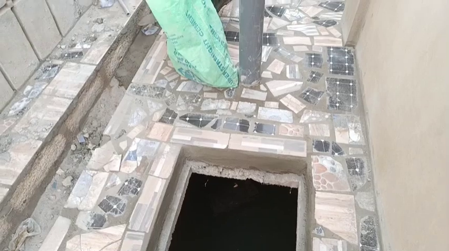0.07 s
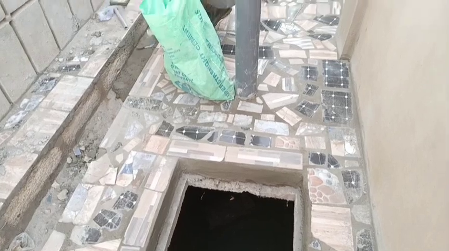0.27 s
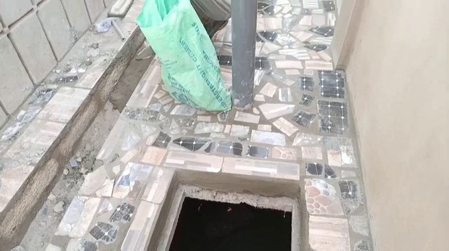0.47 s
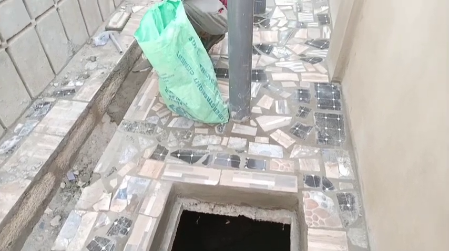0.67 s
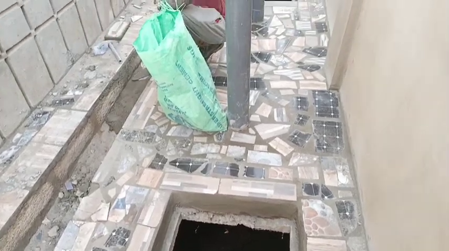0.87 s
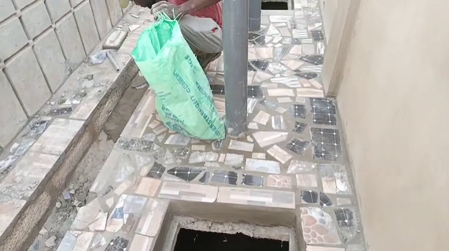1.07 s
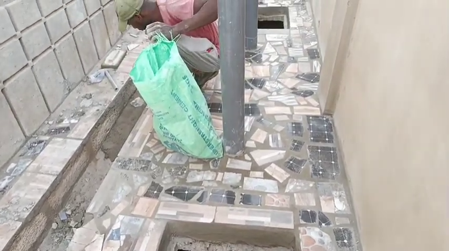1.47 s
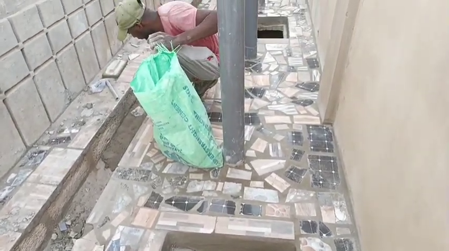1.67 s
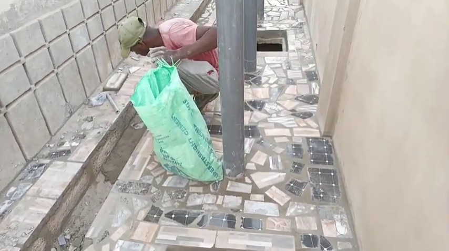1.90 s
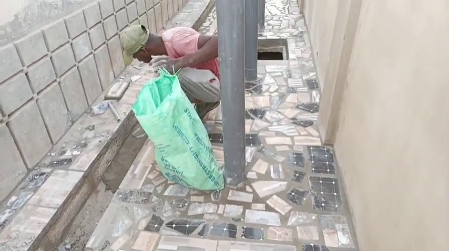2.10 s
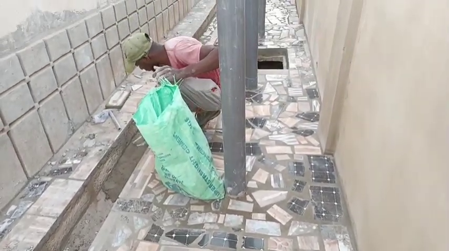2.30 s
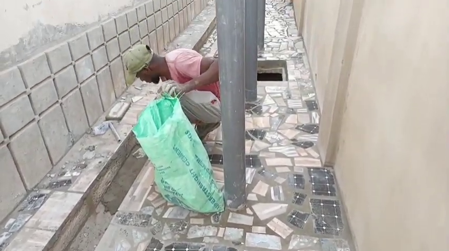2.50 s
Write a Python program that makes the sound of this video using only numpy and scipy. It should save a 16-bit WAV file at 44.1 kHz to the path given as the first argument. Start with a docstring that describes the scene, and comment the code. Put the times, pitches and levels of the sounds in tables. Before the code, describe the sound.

Sharp knocks on broken floor tiles, with clinking pieces and a gritty spill between echoing walls.

```python
"""Knocking broken floor tiles loose

In a narrow outdoor passage, heavy knocks thud and crack, loose pieces clink, and one handful
clatters down in a spill of grit. The walls echo and boom near 100 Hz. A limiter turns the sound
down just ahead of each heavy knock and lets it swell back through the echo."""
import sys
import numpy as np
from scipy import signal
from scipy.fft import rfft, irfft, next_fast_len
from scipy.io import wavfile
from scipy.ndimage import uniform_filter1d, minimum_filter1d

SR = 44100
rng = np.random.default_rng(int(sys.argv[2]) if len(sys.argv) > 2 else 0)


def put_to_file(sound):
    """Save the sound as 16-bit audio at rate SR, in the file named by the first command-line argument."""
    columns = np.atleast_2d(sound).T  # one column per channel
    safe = np.clip(columns, -1, 1)
    whole_steps = np.round(safe * 32767)
    wavfile.write(sys.argv[1], SR, whole_steps.astype(np.int16))


N = 116865
T = np.arange(SR) / SR  # one second of time, for single sounds
SCENE_T = np.arange(N) / SR

# How alike left and right sound: (pitch [Hz], likeness [1 same, 0 unrelated, -1 opposite])
STEREO_LIKENESS = [(100, 1), (200, 0.99), (350, 0.81), (700, 0.37), (1200, -0.44), (2500, 0.11), (6000, 0)]


def from_db(db):
    """Turn decibels into a number to multiply by."""
    return 10 ** (np.asarray(db) / 20)


def at_hz(points, hz):
    """Read between a table's rows, with every octave equally wide."""
    f, value = np.transpose(points)
    return np.interp(np.log(np.maximum(hz, 1)), np.log(f), value)


def band(x, low_hz, high_hz):
    """Keep the sound between two pitches."""
    sections = signal.butter(2, [low_hz, high_hz], "band", fs=SR, output="sos")
    return signal.sosfilt(sections, x + 1e-18)


def tint(x, db_at):
    """Change the tone: turn each pitch up or down by db_at(hz) decibels."""
    size = 2 * next_fast_len(x.shape[-1])
    hz = np.linspace(0, SR / 2, size // 2 + 1)
    cepstrum = irfft(np.log(from_db(db_at(hz))))
    # Folding this in half makes the filter ring after a sound, never before it.
    cepstrum[1:size // 2] *= 2
    cepstrum[size // 2 + 1:] = 0
    return irfft(rfft(x, size) * np.exp(rfft(cepstrum)))[..., :x.shape[-1]]


def shelves(hz, bass_db, treble_db, bass_hz=900, treble_hz=4800):
    """The change in dB from a bass knob and a treble knob."""
    return bass_db / (1 + (hz / bass_hz) ** 2) + treble_db * (1 - 1 / (1 + (hz / treble_hz) ** 8))


def add(out, start_s, sound):
    """Mix a sound in at its start time."""
    start = int(start_s * SR)
    out[:, start:start + sound.shape[1]] += sound[:, :N - start]


def unit_energy(x):
    """Scale each channel to energy 1."""
    return x / np.sqrt(np.sum(x ** 2, axis=-1, keepdims=True))


def air(level_db=-42):
    """Steady outdoor noise, strongest at the low pitch where the passage booms."""
    # Tone of the air: (pitch [Hz], level [dB])
    tone = [(25, -7), (60, 11), (85, -10.5), (101, 22.5), (130, 16.5), (200, 3.5), (400, -9.5), (1000, -12),
            (2000, -18.5), (6000, -16), (16000, -34)]
    middle, side = rng.standard_normal((2, N + SR))
    side = tint(side, lambda hz: 10 * np.log10(1 - np.clip(at_hz(STEREO_LIKENESS, hz), 0, .999)))
    stereo = (middle + side * [[1], [-1]]) / np.sqrt(2)
    return tint(stereo, lambda hz: level_db + at_hz(tone, hz))[:, SR:]


def drone():
    """A low hum between the walls swells and fades."""
    # Loudness of the hum: (time [s], level [dB])
    swell = [(0, -37.5), (.06, -37.5), (.1, -55), (.6, -36), (1.1, -45), (1.499, -60), (1.83, -44.5),
             (2.0, -52), (2.65, -52)]
    hum = band(rng.standard_normal(N + SR), low_hz=91, high_hz=120)[SR:]
    return unit_energy(hum) * np.sqrt(N) * from_db(np.interp(SCENE_T, *np.transpose(swell)))


def wall_echo(build_s=0.002, lumpy_db=1):
    """Sound bounces between the walls in an uneven echo whose low notes last longest."""
    # Length of the echo: (pitch [Hz], time to fade by 60 dB [s])
    fade_times = [(100, 0.95), (250, 0.64), (800, 0.54), (2500, 0.51), (6000, 0.45), (15000, 0.34)]
    hz = np.arange(SR // 2 + 1)
    middle, side = rfft(rng.standard_normal((2, SR)))
    alike = np.clip(at_hz(STEREO_LIKENESS, hz), -1, 1)
    stereo = np.sqrt((1 + alike) / 2) * middle + np.sqrt((1 - alike) / 2) * side * [[1], [-1]]
    edges_hz = [0, 135, 400, 1400, 4500, 9000, SR / 2]
    echo = 0
    for low, high in zip(edges_hz, edges_hz[1:]):
        fade = from_db(-60 * T / at_hz(fade_times, (low + high) / 2))
        echo = echo + irfft(stereo * (hz >= low) * (hz < high)) * fade
    lumps = np.interp(T, np.linspace(0, 1, 400), rng.standard_normal(400))
    return echo * from_db(lumpy_db * lumps) * (1 - np.exp(-T / build_s))


def crunch(decay_s, slap_s=0.0135, slap_db=-11):
    """A brittle hit: a dying burst of tiny breaks, and its slap back off the near wall."""
    burst = rng.standard_normal((2, SR)) * np.exp(-np.minimum(T / decay_s, 50))
    slap = np.array([np.interp(T - slap_s, T, side, left=0) for side in burst])
    return burst + from_db(slap_db) * slap


def piece_tone(spacing_hz=70.4, spread_db=3.5):
    """Each broken piece favours its own random pitches: (pitch [Hz], level [dB])."""
    hz = np.arange(1, 400) * spacing_hz + 500
    level_db = spread_db * (rng.standard_normal(len(hz)) - .3) * (hz > hz[0])
    return np.column_stack([hz, level_db])


def grit(grains_per_s=900, spread_db=2, echo_db=-23):
    """Chips and crumbs of mortar tick at random as they slide."""
    # Loudness of the sliding grit: (time [s], level [dB])
    trickle = [(0, -49.5), (.04, -45), (.12, -45.5), (.19, -40.5), (.3, -35.5), (1.28, -38.5),
               (1.348, -12.5), (1.47, -22.5), (1.58, -25), (1.70, -31), (1.822, -35), (1.91, -59.5),
               (2.4, -45), (2.65, -48)]
    # Tone of the grit: (pitch [Hz], level [dB])
    tone = [(100, -17.5), (1500, -4.5), (4000, -2.5), (6000, 1.5), (16000, -5.5)]
    sizes = from_db(spread_db * np.minimum(rng.exponential(1, N), 3)) * rng.choice([-1, 1], N)
    lands = rng.random(N) < grains_per_s / SR
    ticks = unit_energy(sizes * lands) * np.sqrt(N)
    ticks *= from_db(np.interp(SCENE_T, *np.transpose(trickle)))
    one_grain = unit_energy(crunch(decay_s=0.002) + from_db(echo_db) * wall_echo())
    grains = signal.fftconvolve(ticks[None], one_grain, axes=1)[:, :N]
    return tint(grains, lambda hz: at_hz(tone, hz))


def clinks(ring_s=0.099, echo_db=-8.5):
    """Loose pieces land: each crunches and rings at two pitches, and the walls echo both."""
    # Pieces landing: (time [s], level [dB], first pitch [Hz], second pitch [Hz],
    # ring [dB], bass [dB], treble [dB])
    landings = [(0.805, -12, 2520, 5640, -4.5, 8, 4.5), (1.305, -18, 1890, 2420, 1.5, -17, 1.5),
                (1.313, -14, 1810, 2246, 1.5, -3, -0.5), (1.331, -10, 1743, 1920, -13, -4.5, -6),
                (1.358, -14, 2232, 3135, -3.5, 6, 5.5), (1.410, -23.5, 4717, 6540, -35, -18, 12),
                (1.464, -16.5, 2496, 3580, -4.5, 3.5, 6.5), (1.477, -25.5, 264, 1833, 0, 1.5, 3),
                (1.528, -29, 5550, 6240, -4, -13, 11), (1.598, -23, 297, 2495, -1.5, -1.5, 6),
                (2.052, -16, 2520, 3954, -1.5, -9, 0), (2.1559, -11, 6260, 7080, -5, -20, 7.5),
                (2.572, -27.5, 1093, 3126, -6, 6.5, 5), (2.624, -28, 2270, 5810, -4.5, -5, 5)]
    # Tone shared by all the pieces: (pitch [Hz], level [dB])
    tone = [(50, -18), (110, -15.5), (220, 1), (500, -15), (900, -3.5), (1800, 2.5), (3500, 7.5),
            (6500, -2), (16000, 5.5)]
    out = np.zeros((2, N))
    for start_s, level_db, first_hz, second_hz, ring_db, bass_db, treble_db in landings:
        notes = sum(np.sin(2 * np.pi * hz * T) for hz in (first_hz, second_hz))
        notes *= from_db(-60 * T / ring_s)
        hit = crunch(decay_s=0.011) + from_db(echo_db) * wall_echo()
        ring = signal.fftconvolve(hit, unit_energy(notes)[None], axes=1)[:, :SR]
        clink = hit + from_db(ring_db - 5.5) * ring
        piece = piece_tone()
        clink = tint(clink, lambda hz: at_hz(tone, hz) + at_hz(piece, hz)
                     + shelves(hz, bass_db, treble_db))
        add(out, start_s, from_db(level_db) * clink)
    return out


def knocks(thud_s=0.0025, ring_db=8, ring_width_hz=136,
           duck_pulse_hz=516, duck_pulse_s=0.028, duck_pulse_db=-30.5):
    """Each knock thuds, cracks and leaves an echo with the tile's tone."""
    # Heavy knocks: (time [s], force [dB], thud [dB], crack [dB], crack decay [s], echo [dB],
    # bass [dB], treble [dB], ring pitch [Hz]); force adds to thud, crack and echo.
    blows = [(0.2338, 22, -16, -10.5, 0.0079, -23.5, -5, 2, 2460),
             (0.4632, 13.7, -3, 1, 0.0028, -19, -3.5, 2.5, 2320),
             (.6630, 23.7, -7.5, -6, 0.0066, -22, 1.5, -0.5, 2120),
             (0.8478, 14.1, -2.5, -4.5, 0.0061, -19.5, 0.5, 3, 1890),
             (1.033, 15.5, -6.5, -6.5, 0.0062, -19.5, -5, -1, 2630),
             (1.9391, 6.7, -5, -11.5, 0.03, -21, -3.5, 2, 2230),
             (2.101, 22.6, -15.5, -21.5, 0.015, -33.5, 2.5, 5, 2270),
             (2.283, 18.6, -20, -17, 0.017, -25.5, -9, -2, 2370)]
    # Tone of the dull thud: (pitch [Hz], level [dB])
    thud_tone = [(50, -20.5), (180, 4), (310, -6.5), (400, -25), (660, -30.5), (820, -5.5), (1200, -14.5),
                 (3000, -22), (16000, -38)]
    # Tone of the sharp crack: (pitch [Hz], level [dB])
    crack_tone = [(60, -20), (200, -5.5), (500, -18), (1200, -11.5), (2200, 0), (4500, -5), (6500, -2),
                  (16000, 1.5)]
    # Tone of the booming walls: (pitch [Hz], level [dB])
    echo_tone = [(35, -24), (75, -25.5), (101, 10.5), (130, 3.5), (210, 6.5), (330, 1.5), (520, -8),
                 (750, -1), (1350, -1), (2000, 2), (3200, 1), (4600, 0.5), (6500, -1.5), (16000, -2)]
    out = np.zeros((2, N))
    # A faint, short pulse in each knock makes the limiter turn the sound down.
    duck_pulse = from_db(duck_pulse_db - 60 * T / duck_pulse_s) * np.sin(2 * np.pi * duck_pulse_hz * T)
    for start_s, force_db, thud_db, crack_db, decay_s, echo_db, bass_db, treble_db, ring_hz in blows:
        piece = piece_tone()

        def tile_db(hz):
            """This tile's tone, with a peak where it rings."""
            peak = ring_db / (1 + ((hz - ring_hz) / ring_width_hz) ** 2)
            return shelves(hz, bass_db, treble_db) + at_hz(piece, hz) + peak

        push = rng.standard_normal(SR) * T / thud_s * np.exp(1 - T / thud_s)
        thud = tint(push, lambda hz: thud_db + at_hz(thud_tone, hz))
        crack = tint(crunch(decay_s), lambda hz: crack_db + at_hz(crack_tone, hz) + tile_db(hz))
        echo = tint(wall_echo(), lambda hz: echo_db + at_hz(echo_tone, hz) + tile_db(hz))
        add(out, start_s, from_db(force_db) * (duck_pulse + thud + crack + echo))
    return out


def scene():
    """All the sounds in the passage together."""
    return knocks() + clinks() + grit() + air() + drone()


def limiter(x, limit_db=-36, look_ahead_s=0.0044, duck_s=0.02, recover_db_per_s=110):
    """Turn the sound down just before its low-middle pitches get loud, then steadily back up."""
    sensed = np.abs(band(x.mean(axis=0), low_hz=416.3, high_hz=638.7))
    over_db = np.maximum(20 * np.log10(sensed + 1e-9) - limit_db, 0)
    climb_db = recover_db_per_s * SCENE_T
    gain = from_db(climb_db - np.maximum.accumulate(over_db + climb_db))
    held = minimum_filter1d(gain, int(SR * look_ahead_s) + 1)
    early = np.interp(SCENE_T + look_ahead_s + duck_s / 2, SCENE_T, held)
    return x * uniform_filter1d(np.minimum(gain, early), int(duck_s * SR))


def record(dry, cutoff_hz=16100):
    """Two microphone openings colour the sound; it is limited, clipped and loses its top treble."""
    # Tone of the left opening: (pitch [Hz], level [dB])
    left_tone = [(1000, -2.5), (2800, -5), (4700, -0.5), (5350, 3), (5800, 9), (6400, 13.5), (6900, 2),
                 (7600, -12), (9000, -23), (11000, -15.5), (13600, -20.5), (15200, 2), (16000, -12)]
    # Tone of the right opening: (pitch [Hz], level [dB])
    right_tone = [(1000, -3.5), (2600, -0.5), (4700, -3), (6300, 0.5), (7200, -1), (8200, -14.5),
                  (13500, -19.5), (15300, -8.5), (16000, -17)]
    left = tint(dry[0], lambda hz: at_hz(left_tone, hz))
    right = tint(dry[1], lambda hz: at_hz(right_tone, hz))
    limited = limiter(np.array([left, right]))
    top_cut = signal.ellip(10, .3, 70, cutoff_hz, fs=SR, output="sos")
    return signal.sosfilt(top_cut, np.clip(limited, -1, 1))


dry = scene()
out = record(dry)
put_to_file(out)
```